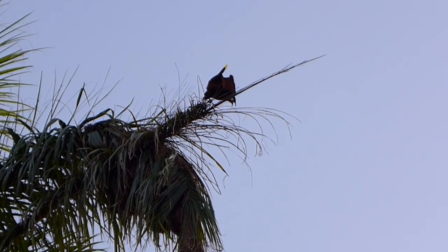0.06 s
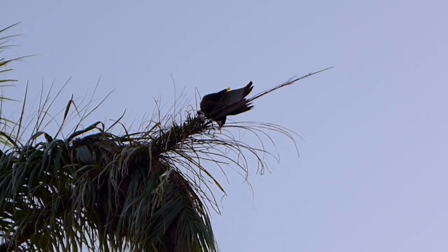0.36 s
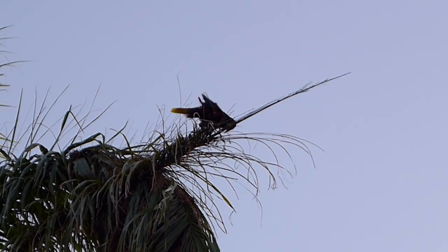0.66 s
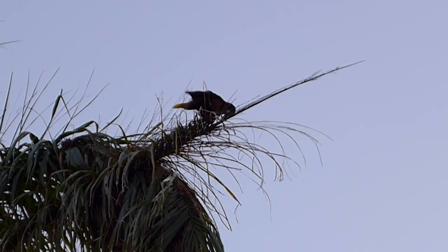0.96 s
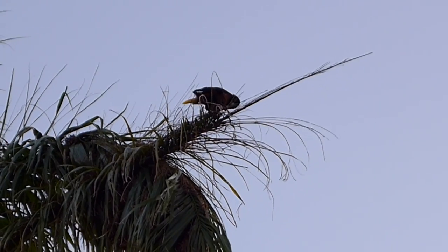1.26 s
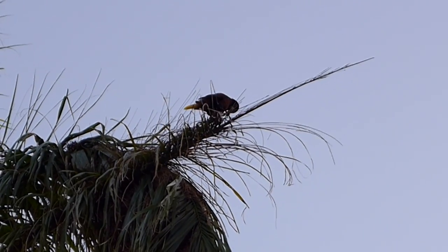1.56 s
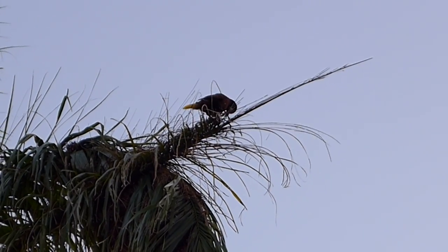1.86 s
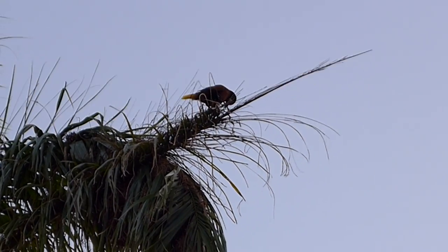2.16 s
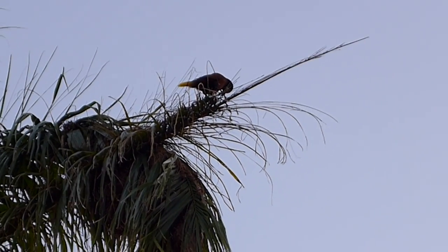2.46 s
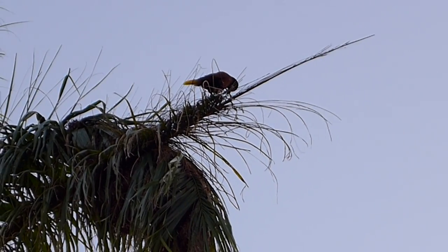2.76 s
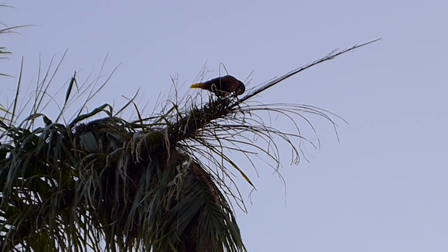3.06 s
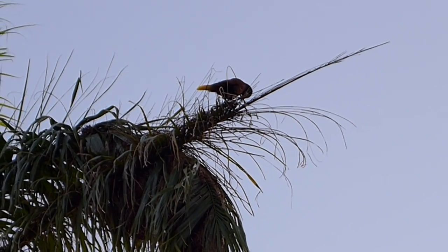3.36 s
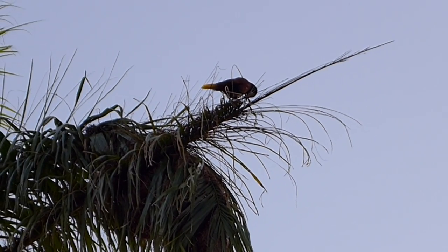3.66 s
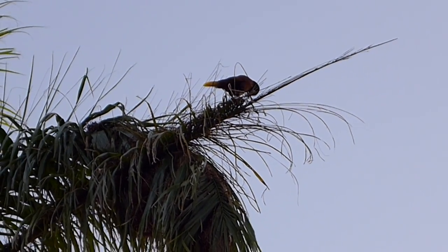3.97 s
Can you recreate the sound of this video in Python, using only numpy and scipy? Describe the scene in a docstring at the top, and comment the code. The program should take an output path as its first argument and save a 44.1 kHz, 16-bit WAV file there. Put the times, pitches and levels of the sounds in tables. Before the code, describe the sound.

One loud bird call opens, sliding quickly between hollow gurgles and wiry squeaks in a forest. Afterwards a steady, high insect buzz continues, a far bird faintly repeats a stuttered note, and small dry clicks sound near the microphone.

```python
"""In the forest, near a palm. An oropendola gives one gurgling, metallic call: the two sides of its
voice box take turns in fast glides, one low and hollow, one high and wiry, and the trees scatter
the sound. Behind it an insect chorus drones over a low rumble and rustle, a far bird repeats a
stuttered note, and a few small clicks sound close to the stereo microphone."""
import sys
import numpy as np
from scipy import signal
from scipy.fft import rfft, irfft
from scipy.io import wavfile
from scipy.ndimage import map_coordinates

SR = 44100
rng = np.random.default_rng(int(sys.argv[2]) if len(sys.argv) > 2 else 0)


def output_pcm(signal):
    """Save a mono or channel-first signal as 16-bit PCM at the path in sys.argv[1].

    Samples are clipped to [-1, 1] before scaling.
    """
    pcm = np.clip(np.atleast_2d(signal).T, -1, 1) * 32767
    wavfile.write(sys.argv[1], SR, np.round(pcm).astype(np.int16))


N = 176400
T = np.arange(N) / SR
TOP_HZ = 15600  # upper edge of the recorder's band
ONSET_S, SCATTER_DELAY_S = 0.0037, 0.004  # edges of the oropendola's notes; first reflections
# spectrum of turbulent air in the voice box: f/Hz, level/dB
RASP_SPECTRUM = [(1000, -32), (1800, 1.5), (4000, -4.5), (7000, 4.5), (10000, 0.5), (12000, -8),
                 (15000, -20)]


def undb(db):
    """Decibels to gain."""
    return 10 ** (np.asarray(db) / 20)


def at_hz(hz, points):
    """Read a table on a log-frequency axis."""
    freqs, values = np.array(points).T
    return np.interp(np.log(np.maximum(hz, 1)), np.log(freqs), values)


def colour(x, points):
    """Filter by a table of f/Hz, level/dB."""
    hz = np.arange(N // 2 + 1) * SR / N
    return irfft(rfft(x) * undb(at_hz(hz, points)), N)


def noise(points):
    """Noise of rms 1 with the given spectral shape."""
    x = colour(rng.standard_normal(N), points)
    return x / x.std()


def walk(rate_hz):
    """A smooth random wander with a standard deviation of 1."""
    knots = rng.standard_normal(4096)
    x = map_coordinates(knots, [T * rate_hz], order=3, mode="wrap")
    return x / x.std()


def gate(start, end, ramp):
    """Open from start to end, with soft edges."""
    inside_s = np.minimum(T - start, end - T)
    return np.sin(np.pi / 2 * np.clip(inside_s / ramp + .5, 0, 1)) ** 2


def pan(x, left_db):
    """Place a sound by the level of left over right."""
    return x * undb(np.array([[left_db], [-left_db]]) / 2)


def spread(mid, side):
    """Mid and side to left and right."""
    return np.array([mid + side, mid - side])


def echo(x, t60s, delay_s):
    """Diffuse reflections of unit energy, dying away by a table of f/Hz, T60/s."""
    hz, t, spectra = signal.stft(rng.standard_normal(N), SR, nperseg=256)
    decay = np.exp(-np.log(1000) * t / at_hz(hz, t60s)[:, None])
    response = signal.istft(spectra * decay, SR)[1][:N] * gate(delay_s, 4, delay_s)
    return signal.fftconvolve(x, response / np.linalg.norm(response))[:N]


def forest():
    """Distant rumble and rustle all round; a narrow band near 850 Hz wavers on its own."""
    # spectrum of the rumble and rustle: f/Hz, level/dB
    spectrum = [(25, -17), (80, -17), (160, -2.5), (270, 2.5), (560, 1), (680, -4), (860, 2.5),
                (1000, -2.5), (1170, 0.5), (1400, -11), (2400, -9.5), (3300, -14), (6000, -26.5)]
    # stereo width, as side over mid: f/Hz, level/dB
    width = [(50, 1), (150, -10), (350, -8.5), (700, -3.5), (1400, 1.5), (3000, -3.5)]
    bed = spread(noise(spectrum), colour(noise(spectrum), width)) * undb(-51 + 0.21 * walk(5.97))
    band = noise([(700, -51), (840, 9), (920, 0), (1050, -51)]) * undb(-65 + 4.4 * walk(9.7))
    return bed + band


def insects():
    """Countless insects, a little to the left, merge into one sizzling band that throbs slightly."""
    # spectrum of the chorus: f/Hz, level/dB
    spectrum = [(2900, -43.5), (3400, -29.5), (3850, -19), (4100, -7.5), (4320, -10.5), (4600, 1.5),
                (4900, 2), (5200, 0.5), (5550, 1.5), (5900, -7.5), (6300, -20), (6700, -23.5), (7100, -23),
                (7700, -27.5), (8700, -28), (9600, -34.5), (10600, -37), (11700, -47), (14500, -66),
                (15600, -69)]
    # slow course of its loudness: t/s, level/dB
    swell = [(0, -25.5), (.8, -26), (1.3, -25.5), (4, -24.5)]
    chorus = spread(mid=noise(spectrum), side=undb(-9) * noise(spectrum))
    swell_db = np.interp(T, *np.array(swell).T)
    throb_db = 0.45 * walk(rate_hz=44.9)
    return pan(chorus, left_db=2.5) * undb(swell_db + throb_db)


def far_bird():
    """Far off among the trees, three short pips run into a longer note that flicks upward."""
    # the calls, timed at the main note: t/s, level/dB
    calls = [(0.831, -44), (2.022, -42.5), (2.631, -40.5), (3.215, -47.5), (3.873, -46)]
    # syllables, timed from the main note: t/s, length/s, start f/Hz, end f/Hz, relative level/dB
    syllables = [(-.068, .009, 1640, 1716, -8.5), (-.043, 0.012, 1660, 1723, -2),
                 (-.02, 0.016, 1736, 1720, 1), (0, 0.019, 1700, 1752, 5), (.019, 0.023, 1732, 1773, 1.5),
                 (.024, .018, 1960, 2320, -7)]
    song = np.zeros(N)
    waver = 1 + 0.022 * walk(500)
    for start, call_db in calls:
        for offset, length, from_hz, to_hz, syllable_db in syllables:
            progress = np.linspace(0, 1, int(length * SR))
            i = int((start + offset) * SR)
            pitch = (from_hz + (to_hz - from_hz) * progress) * np.roll(waver, -i)[:len(progress)]
            envelope = np.sqrt(np.abs(np.sin(np.pi * progress)))
            note = envelope * np.sin(2 * np.pi * np.cumsum(pitch) / SR)
            song[i:i + len(note)] += undb(call_db + syllable_db) * note[:N - i]
    reflections = np.array([echo(song, [(1700, 0.59)], SCATTER_DELAY_S) for _ in range(2)])
    return song + undb(-8) * reflections


def clicks():
    """Small dry clicks close to the microphone, each a bright snap over a short woody knock."""
    # the clicks: t/s, knock level/dB, snap level/dB
    events = [(1.1114, -32, -21.5), (1.34, -38.5, -60), (1.3648, -52, -28), (1.369, -32.5, -43),
              (1.3923, -34, -35), (3.483, -47.5, -60), (3.537, -42, -65)]
    # noise spectrum of the knock: f/Hz, level/dB
    knock_spectrum = [(300, -46), (800, -1), (1250, -1), (1700, -10), (2800, 1), (5000, 3), (9000, -40)]
    # noise spectrum of the snap: f/Hz, level/dB
    snap_spectrum = [(3000, -22), (7000, -1), (9200, 1), (11500, -6), (13500, -9), (16000, -16)]
    # ringing modes of the knock: f/Hz, relative level/dB, T60/s
    modes = [(813, -8, 0.13), (1080, -5, 0.046), (1230, -2.5, 0.038), (1710, -12.5, 0.067), (3730, 3, .02)]
    knock_decay_s, snap_decay_s = 0.0071, 0.0017
    knock_noise, snap_noise = noise(knock_spectrum), noise(snap_spectrum)
    out = np.zeros(N)
    for start, knock_db, snap_db in events:
        age = np.maximum(T - start, 0)
        ring = sum(undb(db) * np.sin(2 * np.pi * hz * age) * np.exp(-np.log(1000) * age / t60)
                   for hz, db, t60 in modes)
        knock = ring + knock_noise * np.exp(-age / knock_decay_s)
        snap = snap_noise * np.exp(-age / snap_decay_s)
        out += (T >= start) * (undb(knock_db) * knock + undb(snap_db) * snap)
    return colour(out, [(150, -30), (600, 0)])


def trees(voice):
    """Reflections of a call: a quick scatter off near fronds, then a long dull tail."""
    # decay time of the tail: f/Hz, T60/s
    tail_t60 = [(500, 0.76), (1200, 1.44), (3000, 0.92), (7000, 0.54), (14000, 0.21)]
    fronds = colour(voice, [(500, -10), (1000, 7), (2500, 4), (8000, 3.5)])
    near_mid, near_side = (echo(fronds, [(1000, 0.15)], SCATTER_DELAY_S) for _ in range(2))
    tail_mid, tail_side = (echo(voice, tail_t60, delay_s=0.02) for _ in range(2))
    scatter = spread(near_mid, undb(-10.5) * near_side)
    tail = spread(tail_mid, undb(-12) * tail_side)
    return undb(-11.5) * scatter + undb(-24) * tail


def glide(rows, throat, db_per_octave):
    """A swept tone, as from a voice box membrane: fundamental, flickering overtones and rasping air."""
    jitter, shimmer_db, shimmer_hz = 0.0031, 4, 79.9
    times, hz, fundamental_db, overtone_db, rasp_db = np.array(rows).T
    opening = gate(times[0], times[-1], ONSET_S)
    sounding = opening > 0
    t = T[sounding]
    pitch = np.interp(t, times, hz) * (1 + jitter * walk(400)[sounding])
    phase = 2 * np.pi * np.cumsum(pitch) / SR
    out = undb(np.interp(T, times, rasp_db)) * noise(RASP_SPECTRUM)
    out[sounding] += undb(np.interp(t, times, fundamental_db)) * np.sin(phase)
    for k in range(2, 15):
        flicker_db = shimmer_db * np.interp(t * shimmer_hz, np.arange(128), rng.standard_normal(128))
        timbre_db = at_hz(k * pitch, throat) + db_per_octave * np.log2(k / 2)
        db = np.interp(t, times, overtone_db) + timbre_db + flicker_db
        out[sounding] += undb(db) * (k * pitch < TOP_HZ) * np.sin(k * phase)
    return opening * out


def squeal():
    """The high voice's wiry squeal: inharmonic partials that waver together over a little rasp."""
    # partials of the squeal: f/Hz, level/dB
    partials = [(6710, -19), (7330, -21.5), (6100, -30), (13600, -48), (14040, -50)]
    wavering_time = np.cumsum(1 + 0.0082 * walk(400)) / SR
    tones = sum(undb(db) * np.sin(2 * np.pi * hz * wavering_time) for hz, db in partials)
    rasp = undb(-37) * noise(RASP_SPECTRUM)
    return gate(start=0.071, end=0.1007, ramp=ONSET_S) * (tones + rasp)


def oropendola():
    """The call from the palm, straight ahead: the low and high sides of the voice box take turns."""
    # the fading echo of an earlier low note, near 800 Hz (imitated by a glide), then the low voice's
    # glides, one list each: t/s, f/Hz, then level/dB of fundamental, overtones and rasp
    echo_and_low_glides = [
        [(0, 850, -34, -62, -58), (.03, 760, -49, -63, -64)],
        [(.035, 948, -34, -62, -60), (.046, 743, -31, -60, -48), (.061, 610, -21.5, -64, -40),
         (.082, 597, -30.5, -63, -43), (.108, 609, -26.5, -60, -50), (.135, 630, -38, -64, -60)],
        [(.147, 896, -26, -29, -38), (.156, 808, -13, -41, -39), (.167, 786.5, -19.5, -39, -45),
         (.185, 825, -13.5, -35.5, -41), (.225, 919, -19.5, -32.5, -42), (.248, 971, -10.5, -33, -48),
         (.27, 1048, -26, -25, -35), (.292, 1129, -35, -24.5, -46), (.308, 1133, -27.5, -26.5, -51),
         (.328, 1099, -39, -26, -32), (.341, 872, -12, -41, -29), (.352, 803, -18, -37, -39),
         (.373, 821, -25, -41, -38)],
        [(.448, 932, -19, -39, -32), (.456, 650, -23, -41, -44), (.473, 626, -17, -52, -53),
         (.487, 595, -31, -60, -65), (.5, 541, -21.5, -62, -70), (.522, 487, -34.5, -68, -77),
         (.55, 403, -39.5, -75, -80)],
    ]
    # the high voice's glides, one list each: t/s, f/Hz, then level/dB of fundamental, overtones and rasp
    high_glides = [
        [(0, 2050, -26, -19, -51), (.022, 2223, -23, -24.5, -59), (.04, 2310, -34, -19.5, -45),
         (.055, 2306, -32, -19.5, -39), (.072, 2320, -47, -27, -42)],
        [(.103, 4340, -26, -17, -42), (.107, 3320, -25, -14, -38), (.114, 2910, -23.5, -27, -39),
         (.12, 2145, -27.5, -18, -34), (.126, 1800, -27, -30, -28), (.135, 1610, -32, -24.5, -33),
         (.144, 1264, -49, -18, -36)],
        [(.37, 963, -48, -24, -38), (.377, 1491, -23, -28, -23), (.386, 1680, -21.5, -22, -38),
         (.4, 1870, -22, -19.5, -35), (.41, 2506, -23.5, -25.5, -39), (.416, 2734, -19, -17, -50),
         (.43, 3100, -29.5, -30, -42), (.436, 2610, -24, -23, -34), (.445, 1278, -35, -20.5, -29)],
    ]
    # resonances of throat and bill on the low voice's overtones: f/Hz, level/dB
    low_throat = [(1200, -13), (1780, -17), (1950, 1.5), (2250, 3), (2500, 2), (2850, 9), (3050, -8),
                  (3400, -2.5), (3900, 7), (4200, 1), (4450, -22), (4800, 10), (5300, 4), (6300, -18),
                  (6900, -0.5), (8000, -10), (9000, -9), (10000, -17), (11300, -11), (12500, -28),
                  (15000, -33)]
    # the same on the high voice's overtones: f/Hz, level/dB
    high_throat = [(1800, -8), (2500, 0), (3100, -15.5), (3800, 1), (4600, 1.5), (5500, -1.5), (6200, -0.5),
                   (7100, -2), (8200, -9), (9300, -11), (11300, -14.5), (12500, -24), (15000, -32)]
    wiry = squeal()
    low = sum(glide(rows, low_throat, db_per_octave=0) for rows in echo_and_low_glides)
    high = sum(glide(rows, high_throat, db_per_octave=-3) for rows in high_glides)
    return undb(1) * (low + high + wiry)


def scene():
    """At the microphone: the call, direct and off the trees, and the forest around it."""
    call = oropendola()
    return pan(call, left_db=0.1) + trees(call) + far_bird() + clicks() + insects() + forest()


def record(dry):
    """The recorder cuts the top with a steep low-pass."""
    lowpass = signal.ellip(10, .1, 80, TOP_HZ, fs=SR, output="sos")
    return signal.sosfilt(lowpass, dry)


dry = scene()
out = record(dry)
output_pcm(out)
```